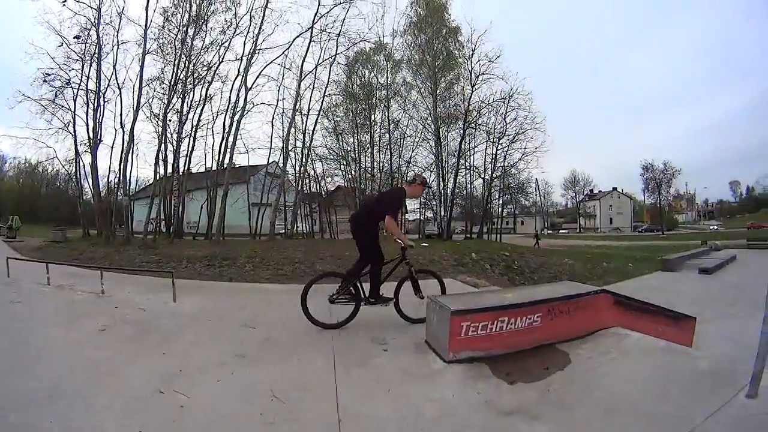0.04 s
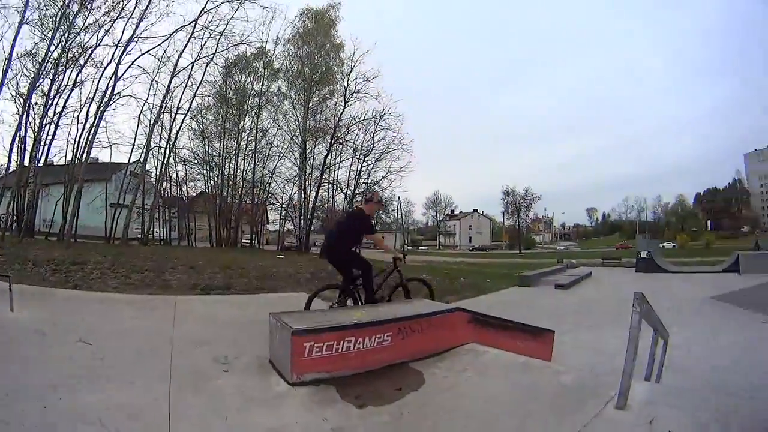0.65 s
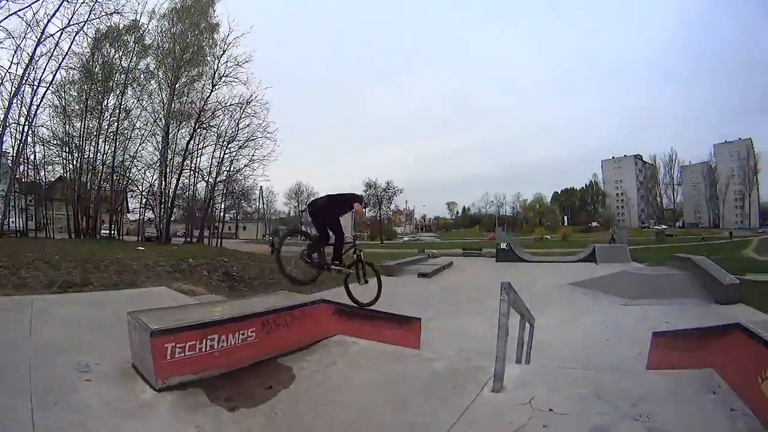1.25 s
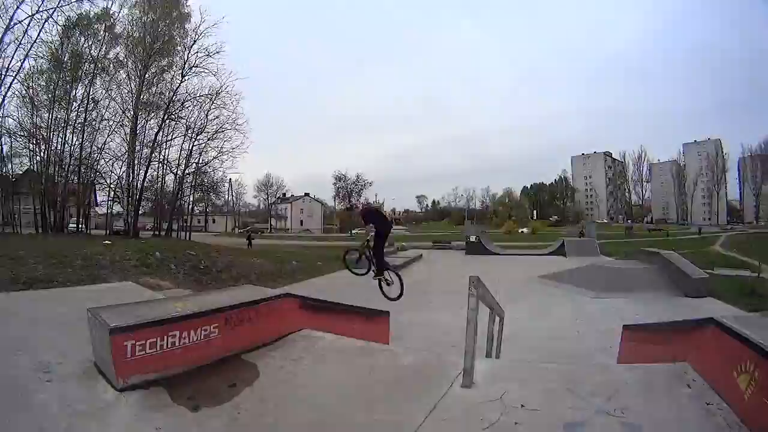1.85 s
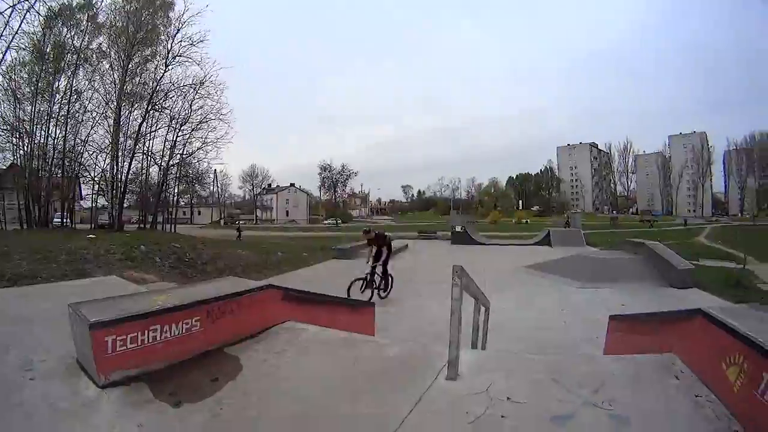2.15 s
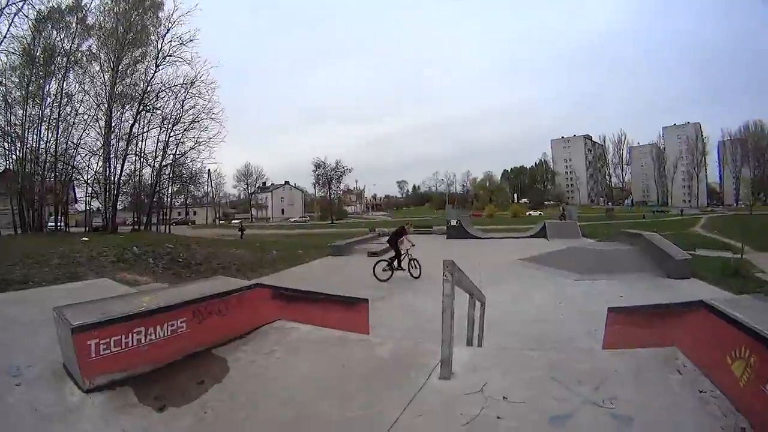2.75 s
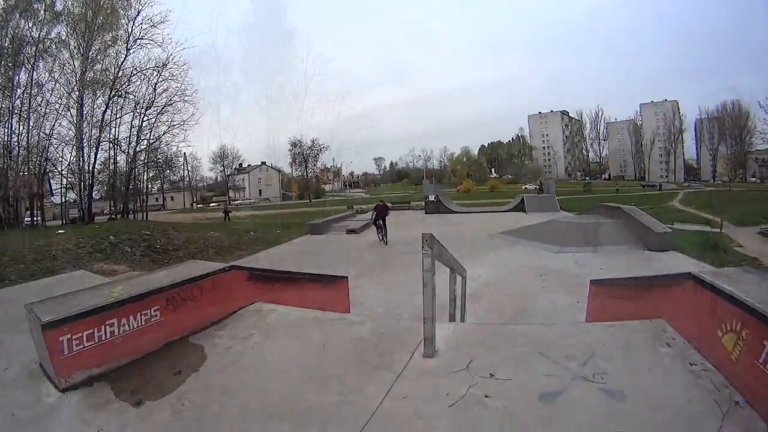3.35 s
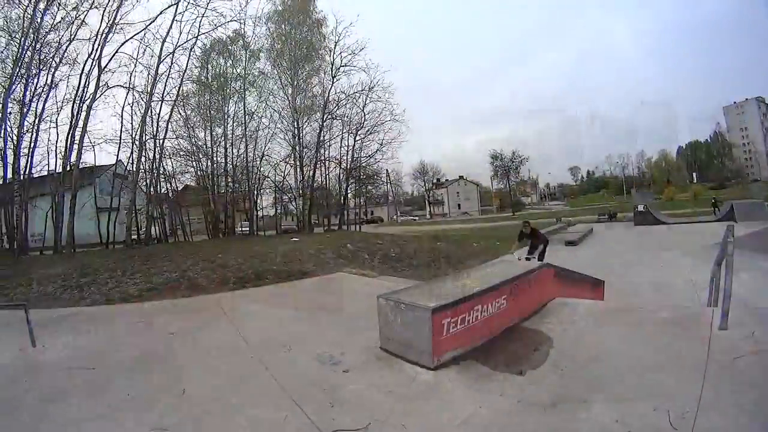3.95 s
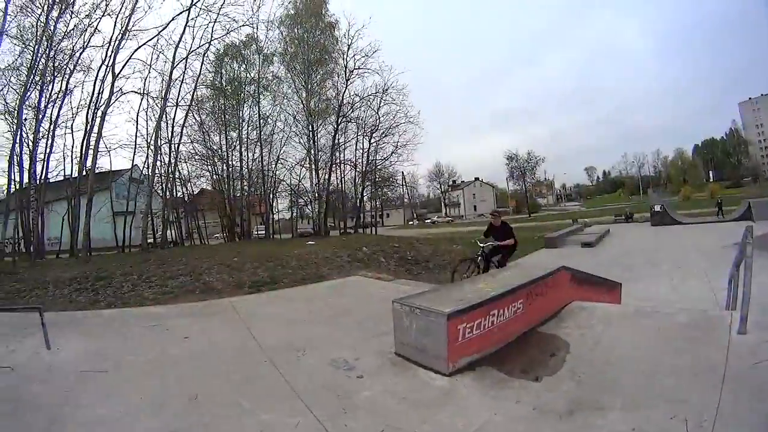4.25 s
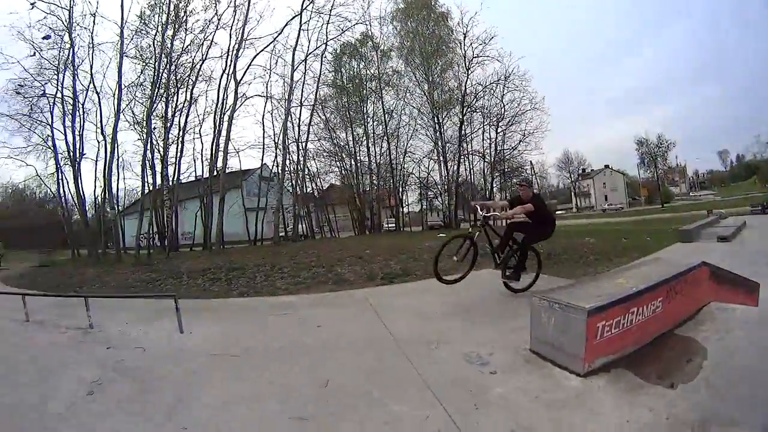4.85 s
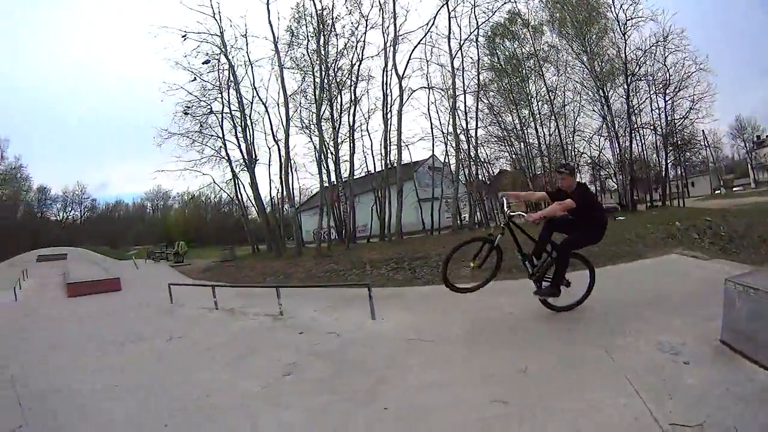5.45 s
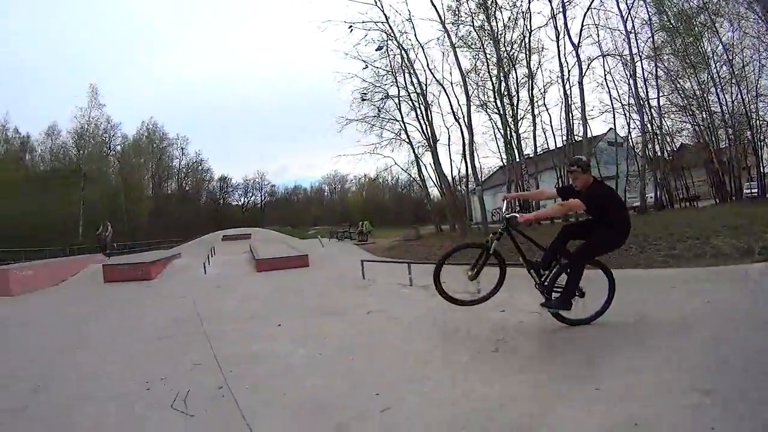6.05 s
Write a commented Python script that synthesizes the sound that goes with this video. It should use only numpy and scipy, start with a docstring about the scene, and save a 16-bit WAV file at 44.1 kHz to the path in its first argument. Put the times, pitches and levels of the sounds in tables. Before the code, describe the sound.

Soft freewheel ticking and metallic bike clanks in an outdoor skatepark, followed by close knocks and bumps on the camera case.

```python
"""A bicycle coasts through a concrete skatepark: freewheel ticking, tyres landing, chain and frame rattling.
It is heard from a hand-held camera in a hard case, whose resonances colour it at the microphone ports.
Right at the microphones, knocks ring the case briefly; soft wind buffets, then bumps, give low thumps.
Behind it all, outdoor hush with light wind blends from the bicycle's first pass into its second."""
import sys
import numpy as np
from scipy import signal
from scipy.fft import rfft, irfft
from scipy.io import wavfile

SR = 44100
rng = np.random.default_rng(int(sys.argv[2]) if len(sys.argv) > 2 else 0)


def persist_wave(psi):
    """Save psi, clipped to +-1, as 16-bit WAV."""
    counts = np.round(np.clip(psi, -1, 1) * 32767).astype(np.int16)
    wavfile.write(sys.argv[1], SR, np.atleast_2d(counts).T)


N = 272979
TIME, BINS = np.arange(N) / SR, np.fft.rfftfreq(N, 1 / SR)
SECOND_PASS = TIME > 3.5
CASE_RISE_S = .0004  # the ringing takes a moment to cross the case

# coasting, pedals still: (start [s], end [s], starting rate [ticks/s], slowing [ticks/s^2], level [dB])
COASTS = [(.008, .42, 31.7, 2, -54), (0.444, .66, 54, 1, -57), (1.298, 2.6, 64, -1, -63.5),
          (4.52, 6.19, 54, 7, -58.5)]
def freewheel(ring_s=0.0083, rise_s=0.0018, uneven_db=2.7, second_pass_db=-8):
    """The pawls drop over one ratchet tooth after another; each drop shakes the hub briefly."""
    drops = np.zeros(N)
    for start, end, rate, slowing, db in COASTS:
        t = np.arange(0, end - start, 1 / SR)
        teeth = np.floor(rate * t - slowing * t ** 2 / 2)
        add(drops, start, amp(db) * np.diff(teeth, prepend=-1))
    drops *= amp(uneven_db * rng.standard_normal(N))
    t = np.arange(2048) / SR
    tick = np.exp(-t / ring_s) * (1 - np.exp(-t / rise_s))
    shake = signal.oaconvolve(drops, tick)[:N] * spread(side_db=-8)
    low = resonate(shake, [(2850, 280, -2), (4990, 370, 3.5)])
    high = resonate(shake, [(7560, 580, -2.5), (7880, 310, -2.5), (8750, 210, 0.5)], lead=0.59)
    # on the second pass the wheel's other side faces the microphones and the low ring is weaker
    return low * amp(second_pass_db * SECOND_PASS - 1) + high * amp(-3)


# the bicycle's rattles and, at 3.37 s, a faint scrape just before the loudest knock:
# (time [s], bright level [dB], dull level [dB], decay [s])
RATTLES = [(0.528, -57, -50.5, 0.038), (.647, -54, -51, .014), (1.082, -51.5, -58, 0.014),
           (1.105, -47.5, -44.5, 0.0085), (1.332, -50, -61, .018), (1.579, -56, -53, 0.016),
           (2.195, -42.5, -45.5, 0.057), (2.802, -36, -46, .011), (2.895, -49, -69, 0.011),
           (3.37, -52, -47, 0.025), (3.575, -51.5, -43.5, 0.015), (3.816, -47.5, -45, 0.0046),
           (4.112, -59, -43.5, 0.022), (4.707, -48.5, -38, 0.021), (4.751, -54, -43, 0.011),
           (5.621, -56.5, -52, 0.03), (5.852, -49, -54, 0.035), (6.183, -39.5, -34, .015)]
# wheels meeting the ledge, or chain slaps: (time [s], bright level [dB], dull level [dB])
CLANKS = [(1.1054, -28, -24), (1.3311, -27, -16), (2.2084, -20.5, -19), (2.557, -22, -39),
          (3.574, -36, -21)]
# bright metallic rattle, coloured by the case's resonances, close by on the second pass:
# (frequency [Hz], width [Hz], weight [dB])
BRIGHT_FIRST = [(3140, 690, -5.5), (5044, 230, 5), (7440, 230, 0.5), (8680, 330, -7.5), (9840, 980, -8.5)]
BRIGHT_SECOND = [(3260, 280, -6), (5080, 670, -1), (7650, 2200, 1.5), (9000, 1500, -8)]
# dull knock of tyres and frame, heard through the case: (frequency [Hz], width [Hz], weight [dB])
DULL_FIRST = [(220, 99, -13), (834, 150, -9), (1450, 37, 0.5), (1600, 55, 2.5), (2430, 200, -16),
              (3090, 86, -11.5)]
DULL_SECOND = [(307, 460, -3), (773, 500, 0.5), (1540, 110, -2.5), (3380, 230, -15)]
def rattles(rise_s=0.0048, contact_s=.0015, clump_s=.007, dull_cutoff_hz=3500):
    """Sharp blows and dying showers of small, clumped contacts sound through the case's resonances."""
    rattle, scuff = np.zeros((2, N))
    t = np.arange(SR // 2) / SR
    for s, bright_db, dull_db, decay in RATTLES:
        shape = np.minimum(t / rise_s, 1) * np.exp(-np.maximum(t - rise_s, 0) / decay)
        add(rattle, s, amp(bright_db) * shape)
        add(scuff, s, amp(dull_db) * shape)
    grain = flutter(depth_db=3, step_s=contact_s) * flutter(depth_db=2, step_s=clump_s)
    rattle = rattle * grain * spread(side_db=-21)
    scuff = scuff * grain * spread(side_db=1)
    for s, bright_db, dull_db in CLANKS:
        add(rattle, s, amp([bright_db]))
        add(scuff, s, amp([dull_db]))
    bright = resonate(rattle * ~SECOND_PASS, BRIGHT_FIRST)
    bright += resonate(rattle * SECOND_PASS, BRIGHT_SECOND)
    dull = resonate(scuff * ~SECOND_PASS, DULL_FIRST, lead=0.17)
    dull += resonate(scuff * SECOND_PASS, DULL_SECOND, lead=0.43)
    soft_contact = signal.butter(2, dull_cutoff_hz, fs=SR, output="sos")
    return bright + signal.sosfilt(soft_contact, dull)


def landing(s=2.204, level_db=-46.5, decay_s=.045):
    """The tyres boom briefly as the bicycle drops off the ledge."""
    return amp(level_db) * resonate(burst(s, decay_s, side_db=-10), [(215, 45, 0), (300, 55, -3)])


# pings heard through the case: (time [s], frequency [Hz], level [dB], decay [s])
PINGS = [(1.105, 2430, -47, .007), (2.557, 5070, -39, .004), (5.216, 5050, -51, .012)]
def pings(width_hz=170):
    """Brief bright pings, each ringing at a resonance of the case."""
    return sum(amp(db) * resonate(burst(s, decay, side_db=-9), [(hz, width_hz, 0)])
               for s, hz, db, decay in PINGS)


# tyres on concrete, loudest close to the microphones: (time [s], level [dB])
ROLLING = [(0, -65), (.6, -65), (.8, -68.5), (2.1, -75), (4.2, -69), (4.7, -67), (6.19, -64)]
# hum of the tread: (frequency [Hz], width [Hz], weight [dB])
TREAD = [(257, 34, 3.5), (334, 98, -6), (3140, 520, 0)]
def rolling():
    """The tread hums on the concrete, louder as the bicycle comes near."""
    return amp(np.interp(TIME, *np.transpose(ROLLING))) * resonate(spread(side_db=5.0), TREAD)


# knocks right at the microphones: (time [s], level [dB], brightness [Hz], low-mode weight [dB],
# delay of a second contact or 0 for none [s], its brightness [Hz])
KNOCKS = [(3.3373, -26.5, 6060, -3.5, 0, 0.00051), (3.3969, -15.5, 1750, 1, 0.0015, 6800),
          (3.7410, -22, 5700, 2, 0.0064, 5500), (3.7745, -36.5, 10000, -4, 0, 0),
          (4.1337, -28, 8500, -4, 0.017, 3300), (4.3431, -18.5, 1240, -1.5, 0, 0),
          (5.6156, -19.5, 1170, -5.5, .0034, 953), (6.0688, -28.5, 840, -4.5, 0, 0),
          (6.1835, -32, 1710, -15, 0, 0)]
# the hand closing on the case: (time [s], damping [dB/s])
GRIP = [(3.45, 0), (3.74, 400), (4.1, 1350)]
# the knocks at the left and right microphone: (gain [dB])
KNOCK_BALANCE = [
    [-.7],
    [.7],
]
def knocks():
    """Knocks on the case, some touching twice, ring less as the grip tightens."""
    out = np.zeros((2, N))
    for s, db, bright_hz, low_db, again_s, again_hz in KNOCKS:
        damping = np.interp(s, *np.transpose(GRIP))
        add(out, s, amp(db) * case_ring(bright_hz, low_db, damping))
        if again_s > 0:
            add(out, s + again_s, amp(db) * case_ring(again_hz, low_db, damping))
    return out * amp(KNOCK_BALANCE)


# modes of the case: (frequency [Hz], level [dB], ungripped t60 [s], lead of the right port [rad])
CASE_MODES = [(440, -17, 0.028, 0.67), (601, -7.5, 0.04, 1.9), (655, -22.5, 0.17, 1.7),
              (762, -3, 0.027, 0.93), (849, -12.5, 0.051, 1.6), (1145, -8, 0.035, 0.87),
              (1385, 4, 0.015, 0.83), (1529, -10, 0.032, 0.99), (1677, -8, 0.044, 1.6),
              (1990, 0, 0.018, 2.8), (2600, -12, 0.027, 2.3), (3120, -1, 0.011, 1.73),
              (4660, -4, 0.012, 0.61), (4850, -14, .014, .8), (5000, -22, 0.034, 0.95),
              (5610, -8.5, 0.012, 1.5), (7200, 0.5, 0.005, 1), (9040, -3, 0.0069, 1.1),
              (10450, -1.5, 0.0052, 0.92)]
def case_ring(bright_hz, low_db, damping, low_hz=950):
    """One contact rings the case; a softer one reaches fewer of the high modes."""
    t, ports = np.arange(SR // 4) / SR, np.array([[-.5], [.5]])
    ring = np.zeros((2, len(t)))
    for hz, mode_db, t60, lead in CASE_MODES:
        strength = amp(mode_db + low_db / (1 + (hz / low_hz) ** 4))
        strength /= np.sqrt(1 + (hz / bright_hz) ** 8.9)
        ring += strength * amp(-60 * t / t60) * np.cos(2 * np.pi * hz * t + lead * ports)
    build = 1 - np.exp(-(t / CASE_RISE_S) ** 2)
    return ring * build * amp(-damping * t)


# low thumps at the microphones: three soft wind buffets, then bumps on the camera:
# (time [s], level [dB], starting frequency [Hz])
THUMPS = [(.047, -41, 70), (1.234, -42, 90), (1.829, -46, 90), (3.413, -30.5, 53), (3.75, -34.5, 172),
          (3.764, -31.5, 62.4), (4.164, -37, 130), (4.183, -33.5, 151), (4.3437, -18, 96),
          (4.711, -31.5, 41.7), (4.75, -37, 109), (5.6160, -20, 118), (6.0693, -24.5, 131),
          (6.1833, -15, 137)]
def thumps(sag=0.33, sag_s=0.0066, port_lag_s=0.00026, swing_hz=101, swing_t60_s=.037):
    """A wind buffet or a bump pushes the air at the microphone ports; the swing slows as it dies."""
    out, t = np.zeros((2, N)), np.arange(SR // 2) / SR
    for s, db, hz in THUMPS:
        t60 = swing_t60_s * (swing_hz / hz) ** 1.6  # lower thumps last longer
        turns = hz * t * (1 - sag * t / (t + sag_s))
        push = -amp(db - 60 * t / t60) * np.sin(2 * np.pi * turns)
        add(out[0], s, push)
        add(out[1], s + port_lag_s, push)
    return out


# bands the case holds back from the microphones: (frequency [Hz], width [Hz], gain [dB])
CASE_DIPS = [(2690, 110, -9), (3650, 170, -2.5), (6170, 200, -9)]
def through_case(x, bass_cut_hz=170):
    """The case's walls cut valleys between its resonances and pass little bass."""
    dips_db = sum(db * np.exp(-2 * ((BINS - hz) / width) ** 2) for hz, width, db in CASE_DIPS)
    bass_cut = signal.butter(2, bass_cut_hz, "high", fs=SR, output="sos")
    return signal.sosfilt(bass_cut, irfft(rfft(x) * amp(dips_db), N))


def park_echoes(x, t60=0.28, echoes_per_s=2000, first_echo_s=.006):
    """Scattered echoes come back from the concrete and the ramps."""
    t = np.arange(SR // 2) / SR
    taps = rng.standard_normal((2, len(t))) * (rng.random((2, len(t))) < echoes_per_s / SR)
    taps *= amp(-60 * t / t60) * (t > first_echo_s)
    return signal.oaconvolve(x, taps / np.linalg.norm(taps[0]), axes=1)[:, :N]


# open air over the park on each pass, mid and side: (frequency [Hz], relative level [dB])
MID_FIRST = [(12, -32), (20, 2), (48, 0), (127, -9), (165, -8.5), (365, -17.5), (528, -19.5), (670, -20),
             (920, -15.5), (1520, -16), (1690, -31.5), (2200, -22.5), (5540, -25.5), (6660, -24.5),
             (11000, -28.5), (14300, -99), (22000, -120)]
MID_SECOND = [(12, 0.5), (20, 1), (67, -5), (137, -16.5), (337, -21.5), (652, -26), (1260, -21),
              (1480, -13), (1690, -21.5), (2320, -21), (2940, -32), (4850, -29.5), (7210, -34), (8450, -33),
              (11000, -36), (14300, -91), (22000, -120)]
SIDE_FIRST = [(24, -45), (40, -8), (295, 0), (483, 4), (1050, 4.5), (1640, -23), (1930, -2), (2880, -1),
              (8100, -11.5), (11000, -17), (14300, -54), (22000, -120)]
SIDE_SECOND = [(24, -44), (40, -18), (124, -16), (400, -6.5), (1270, -7), (1460, -29), (1720, -14.5),
               (2750, -8.5), (7920, -23), (11000, -27), (14300, -57), (22000, -120)]
def outdoor_hush(blend_start_s=3.14, blend_end_s=4.4):
    """The hush of the first pass gives way to that of the second."""
    first = air(MID_FIRST, SIDE_FIRST, mid_db=-57, side_db=-60)
    first += amp(-71) * hollow([(1472, 410, -0.47), (1657, 174, -1.5)])
    second = air(MID_SECOND, SIDE_SECOND, mid_db=-51, side_db=-58)
    second += amp(-70) * hollow([(1494, 176, -2), (1724, 200, -4)])
    share = np.clip((TIME - blend_start_s) / (blend_end_s - blend_start_s), 0, 1)
    return np.sqrt(1 - share) * first + np.sqrt(share) * second


def air(mid, side, mid_db, side_db):
    """Steady outdoor noise across the two microphones."""
    return stereo(amp(mid_db) * noise(mid), amp(side_db) * noise(side))


def hollow(modes):
    """The air inside the case resonates with a hollow tone."""
    return resonate(resonate(spread(side_db=-25), modes), modes)


def gusts(x, top_hz=170, depth_db=2.0, gust_s=.09):
    """Light wind makes the rumble at the ports come and go."""
    rumble = irfft(rfft(x) / (1 + (BINS / top_hz) ** 4), N)
    return x + rumble * (flutter(depth_db, gust_s) - 1)


# the camera's own tones, beside the microphones: (frequency [Hz], level [dB])
WHINE = [(6713, -80.5), (6773, -78)]
def camera_whine():
    """The camera gives off a faint, thin whine."""
    return sum(amp(db) * np.sqrt(2) * np.sin(2 * np.pi * (hz * TIME + rng.random())) for hz, db in WHINE)


def resonate(x, modes, lead=0.8):
    """Resonances (frequency [Hz], width [Hz], weight [dB]); the right port leads by `lead` radians."""
    t, ports = np.arange(2048) / SR, np.array([[-.5], [.5]]) * lead
    ring = sum(amp(db) * width * np.exp(-np.pi * width * t) * np.cos(2 * np.pi * hz * t + ports)
               for hz, width, db in modes)
    ring *= 1 - np.exp(-(t / CASE_RISE_S) ** 2)
    # no steady pressure passes the case
    ring = signal.lfilter([1, -1], [1, -np.exp(-2 * np.pi * 100 / SR)], ring)
    return signal.oaconvolve(x, ring / np.linalg.norm(ring[0]), axes=1)[:, :N]


def noise(spectrum):
    """Steady noise shaped by (frequency [Hz], level [dB]) points on a log-frequency axis."""
    hz, db = np.transpose(spectrum)
    gain = amp(np.interp(np.log(BINS + 1), np.log(hz + 1), db))
    return unit_rms(irfft(rfft(rng.standard_normal(N)) * gain, N))


def burst(s, decay_s, side_db):
    """Stereo noise that starts at time s and dies away."""
    return (TIME > s) * np.exp(-np.maximum(TIME - s, 0) / decay_s) * spread(side_db)


def spread(side_db):
    """White noise, partly shared by the two ports."""
    return unit_rms(stereo(rng.standard_normal(N), amp(side_db) * rng.standard_normal(N)))


def flutter(depth_db, step_s):
    """A gain that wanders at random, with a new value every step."""
    knots = np.arange(0, N / SR, step_s)
    return unit_rms(amp(depth_db * np.interp(TIME, knots, rng.standard_normal(len(knots)))))


def stereo(mid, side):
    """Mid and side to left and right."""
    return np.array([mid + side, mid - side])


def add(mix, s, sound):
    """Mixes a sound in at time s."""
    part = mix[..., max(round(s * SR), 0):][..., :sound.shape[-1]]
    part += sound[..., :part.shape[-1]]


def amp(db):
    """Decibels to gain."""
    return 10 ** (np.asarray(db) / 20)


def unit_rms(x):
    """Scales to an rms of one."""
    return x / np.sqrt(np.mean(x ** 2) + 1e-20)


def scene():
    """The bicycle out on the concrete, the case in the hand and the hush around them."""
    bicycle = through_case(freewheel() + rattles() + landing() + pings()) + rolling()
    case = through_case(knocks())
    background = gusts(outdoor_hush() + camera_whine())
    outdoors = bicycle + amp(-11.5) * park_echoes(bicycle) + background
    outdoors *= amp([[.3], [-.3]])  # slightly louder at the left microphone
    return outdoors + case + amp(-20.5) * park_echoes(case) + thumps()


def record(dry, edge_hz=11150):
    """The camera's band limit cuts off the top treble."""
    lowpass = signal.firwin(801, edge_hz, window=("kaiser", 7), fs=SR)
    return signal.oaconvolve(dry, lowpass[None], "same")


dry = scene()
out = record(dry)
persist_wave(out)
```